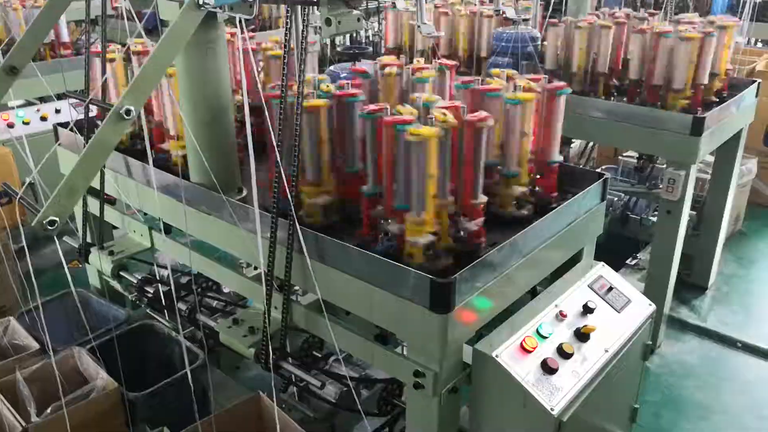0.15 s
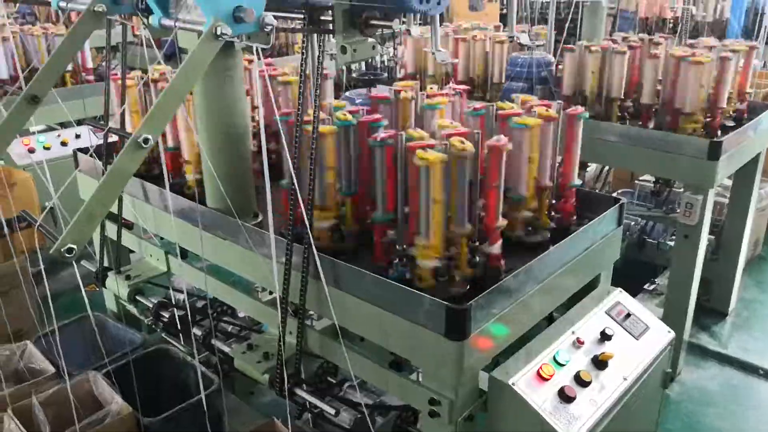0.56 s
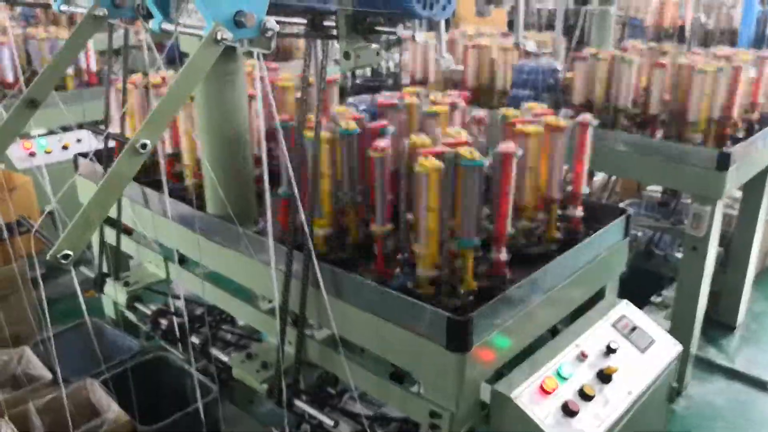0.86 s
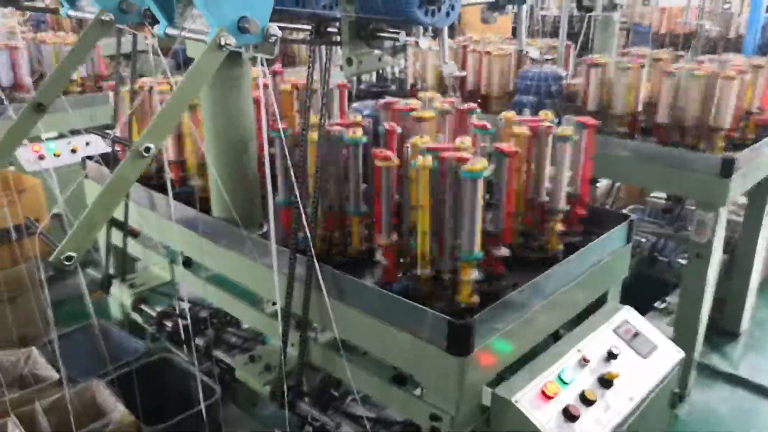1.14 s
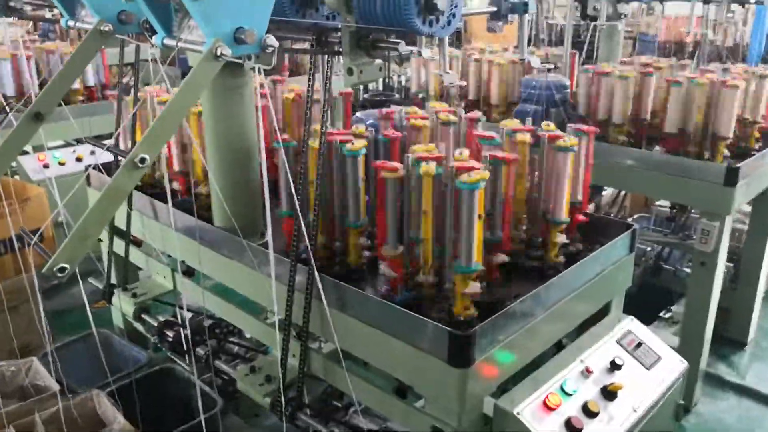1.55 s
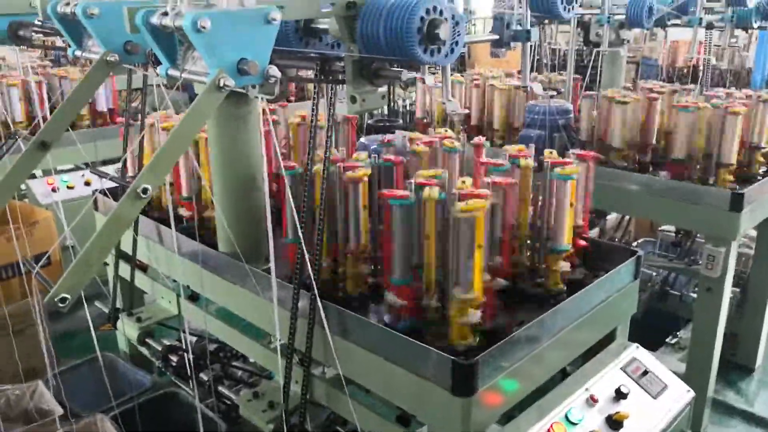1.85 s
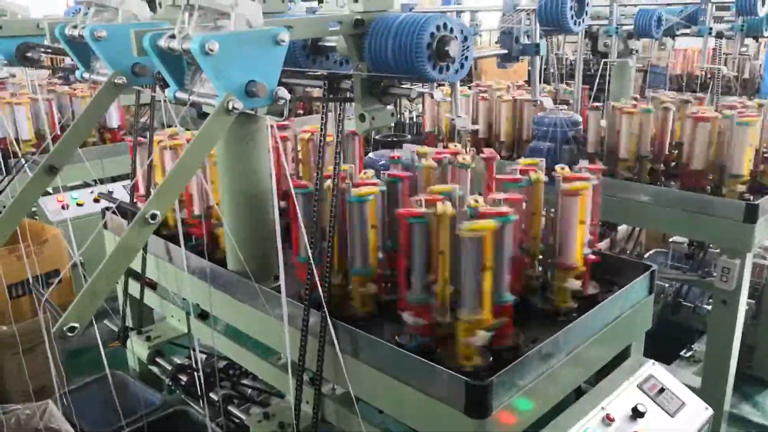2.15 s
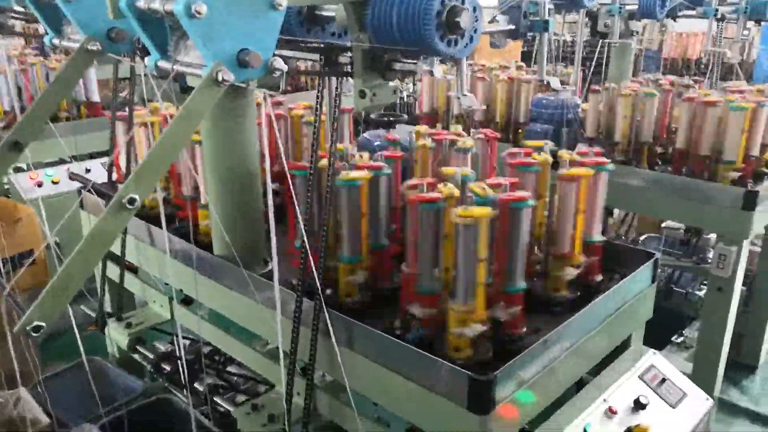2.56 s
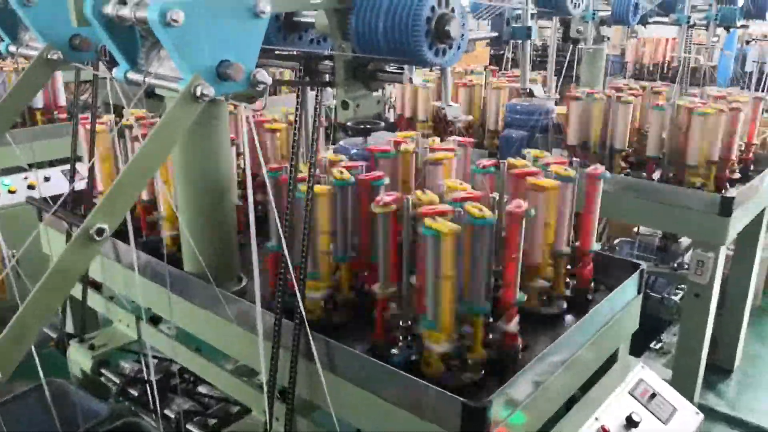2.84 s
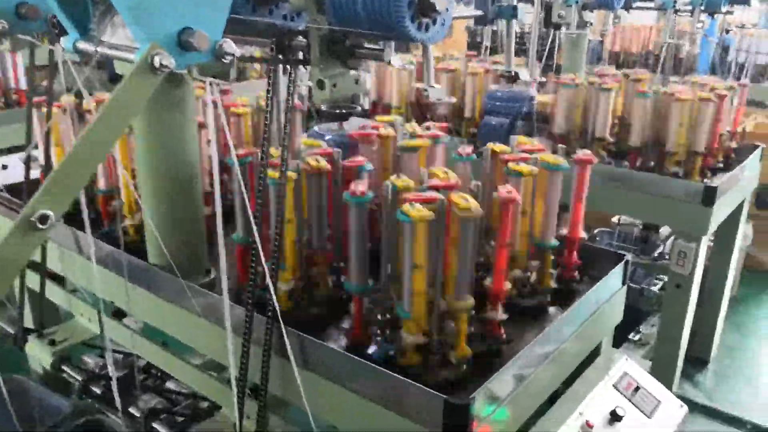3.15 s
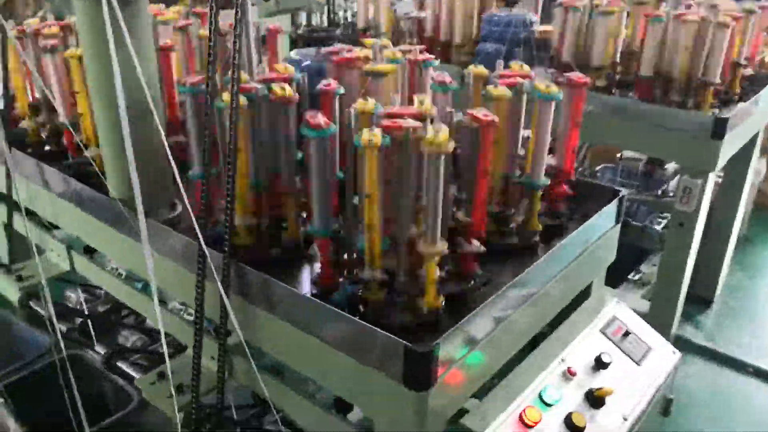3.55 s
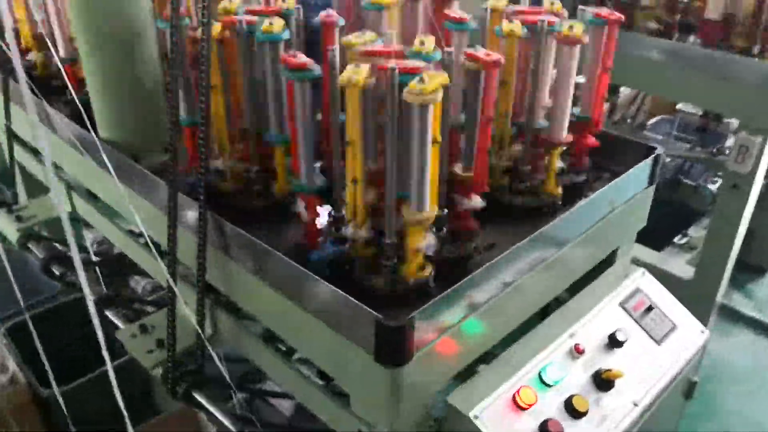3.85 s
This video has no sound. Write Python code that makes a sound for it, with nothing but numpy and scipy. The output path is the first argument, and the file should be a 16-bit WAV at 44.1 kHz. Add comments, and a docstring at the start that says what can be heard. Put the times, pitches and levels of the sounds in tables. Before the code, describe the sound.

Rope braiding machines clatter at full speed in a dense metallic roar inside a hard-walled factory.

```python
"""Rope braiding machines clatter at full speed in a hard-walled factory hall; after a short silence they cut in.
Bobbin carriers clack from one horn gear to the next: random ticks crowd round each handover and ring small
steel parts. A diffuse hall tail and a noise wash of far machines blur them into a roar.
Underneath, filtered noise gives the rumble of the frames, and wavering sines the drive hum and gear whine."""
import sys
import numpy as np
from scipy import signal
from scipy.fft import rfft, irfft
from scipy.io import wavfile
from scipy.ndimage import uniform_filter1d, minimum_filter1d

SR = 44100
rng = np.random.default_rng(int(sys.argv[2]) if len(sys.argv) > 2 else 0)


def to_wav(sig):
    """Store sig (one row per channel, or 1-D mono) as 16-bit WAV at the path in sys.argv[1].

    Samples outside -1..1 are clipped; the rate is SR.
    """
    pcm = np.clip(np.atleast_2d(sig), -1, 1) * 32767
    pcm = np.round(pcm).astype(np.int16)
    wavfile.write(sys.argv[1], SR, pcm.T)  # frames by channels


N = 176400
T = np.arange(N) / SR   # time [s]
BIN_HZ = np.arange(N // 2 + 1) * SR / N

TICKS_PER_S, TICK_SPREAD_DB = 900, 3.0   # per machine
BUNCHING = .55   # how tightly ticks crowd round a handover
RING_T60_S, RING_DB = 0.014, -2.5   # decay of the lowest part; level against the bare ticks
LAG_SPREAD_MS = .08   # the parts of one machine lie in slightly different directions


def carriers(handovers_per_s, handover_s, lag_ms, count=72):
    """Periodically modulated random impacts: each tick excites one steel part, heard from its own direction."""
    crowd = np.exp(BUNCHING * np.cos(2 * np.pi * handovers_per_s * (T - handover_s)))
    at = np.flatnonzero(rng.random(N) < TICKS_PER_S * crowd / crowd.mean() / SR)
    size_db = TICK_SPREAD_DB * np.minimum(rng.exponential(1, at.size), 3.5)
    sizes = from_db(size_db) * rng.choice([-1, 1], at.size)
    part = rng.integers(0, count, at.size)
    grip = rng.uniform(-0.97, 1, at.size)   # how well each contact couples to its part
    # one random pitch in each of equal musical steps from 1200 to 9000 Hz
    pitches = 1200 * 7.5 ** ((np.arange(count) + rng.random(count)) / count)
    lags_ms = lag_ms + LAG_SPREAD_MS * rng.standard_normal(count)
    lags = np.round(lags_ms * SR / 1000).astype(int)   # in samples
    ticks, rings = np.zeros((2, N)), np.zeros((2, N))
    for k in range(count):
        chosen = part == k
        clicks, strikes = np.zeros(N), np.zeros(N)
        clicks[at[chosen]] = sizes[chosen]
        strikes[at[chosen]] = (sizes * grip)[chosen]
        height = pitches[k] / pitches[0]
        rung = height * ring(strikes, pitches[k], RING_T60_S / height)   # higher parts die away sooner
        ticks += [clicks, np.roll(clicks, lags[k])]
        rings += [rung, np.roll(rung, lags[k])]
    return rms_one(ticks) + from_db(RING_DB) * rms_one(rings)


def ring(clicks, hz, t60):
    """Damped resonance: a two-pole filter rings as one struck mode."""
    r, w = from_db(-60 / (t60 * SR)), 2 * np.pi * hz / SR
    poles = [1, -2 * r * np.cos(w), r * r]
    return signal.lfilter([np.sin(w), 0, -np.sin(w)], poles, clicks + 1e-18) / np.sin(w)


# Nearby machines: (handovers [1/s], time of one handover [s], level before colour and swells [dB],
# left-right level difference before colour [dB], mean lag of the right ear [ms])
NEAR_MACHINES = [(19.14, .415, -24.5, 4, -.6), (18.44, .393, -25, 0, -.55), (13.86, .403, -26.5, 1.5, .6)]


def near_machines():
    """Interaural level and time differences place each machine in the stereo field."""
    machines = []
    for handovers_per_s, handover_s, db, pan_db, lag_ms in NEAR_MACHINES:
        ear_db = db + np.array([[pan_db], [-pan_db]]) / 2
        machines.append(from_db(ear_db) * rms_one(carriers(handovers_per_s, handover_s, lag_ms)))
    return machines


# The clatter swells as the carriers circle: (rate [1/s], time of one crest [s], depth before SWELL_DEPTH [dB])
CIRCLING_SWELLS = [(2.66, .45, .36), (.77, 1.2, .3), (4.42, .553, .24), (3.11, .553, .16)]
SWELL_DEPTH = .8   # share of the listed depths


def circling_db():
    """Amplitude modulation: periodic swells add up in dB."""
    swells = [db * np.cos(2 * np.pi * rate * (T - crest_s)) for rate, crest_s, db in CIRCLING_SWELLS]
    return SWELL_DEPTH * sum(swells)


# Relative spectrum of the steel clatter: (frequency [Hz], left density [dB per Hz], right density [dB per Hz])
STEEL_COLOUR = [(60, -43, -49), (250, -21, -21), (436, -5.5, -5), (554, -11.5, -11), (797, -2.5, -2),
                (945, -6, -5.5), (1455, -6, -5), (1606, -2.1, -3), (2200, -2.5, 0.4), (2840, -2.5, -2),
                (3070, -4.5, -4), (3940, -7.5, -6.5), (5030, -8, -5.5), (5270, -5.5, -3.5),
                (5950, -6.5, -4), (6100, -11.5, -6), (6880, -7, -5), (7200, -3, -6), (7900, -9, -9.5),
                (8190, -16.5, -16), (9060, -21.5, -19.5), (10100, -30.5, -25.5), (12500, -40.5, -34),
                (15000, -48, -38.5)]


def steel(both):
    """Spectral shaping: each ear's clatter takes on the colour of the steel."""
    sides_db = np.array([at_hz(STEEL_COLOUR, column=1), at_hz(STEEL_COLOUR, column=2)])
    gains = rms_one(np.sqrt(np.mean(from_db(sides_db) ** 2, axis=1)))   # balance of the ears
    return np.array([gain * x.std() * colour(x, db) for x, db, gain in zip(both, sides_db, gains)])


# Course of the clatter, played about its mean and scaled by CLATTER_FOLLOWS: (time [s], level [dB])
CLATTER_COURSE = [(0.45, -13.5), (0.47, -15), (0.79, -15), (2.2, -14), (2.24, -18), (2.36, -14),
                  (2.5, -15.5), (2.77, -13), (3.27, -14.5), (3.45, -12), (3.6, -15), (3.95, -13.5)]
CLATTER_FOLLOWS = 0.39   # share of the swing that is played
HALL_DB = -3   # tail against the near machines
FAR_DB, FAR_FLUTTER_DB = -13.5, 0.2   # wash before colour and swells; rms flutter


def clatter():
    """Superposition of direct sound, reverberant tail and a distant wash under one envelope and colour."""
    machines = near_machines()
    near = sum(machines)
    tail = from_db(HALL_DB) * near.std() * hall([machine[0] for machine in machines])
    far = from_db(FAR_DB + FAR_FLUTTER_DB * drift(25)) * rng.standard_normal((2, N))
    level_db = circling_db() + CLATTER_FOLLOWS * swing(CLATTER_COURSE)
    return steel((near + tail + far) * from_db(level_db))


HALL_T60_S = 1.2


def hall(sources):
    """Diffuse reverberation: convolution with decaying noise, different for each source and each ear."""
    decay = from_db(-60 * T / HALL_T60_S)
    tails = [rfft(x) * rfft(rng.standard_normal((2, N)) * decay) for x in sources]
    return rms_one(irfft(sum(tails), N))


# Course of the level around 172 Hz, hum and noise together, played about its mean and scaled by HUM_FOLLOWS:
# (time [s], level [dB])
HUM_BAND_COURSE = [(0.37, -25), (0.68, -23.5), (1.12, -37), (1.22, -45), (1.31, -37), (1.75, -22),
                   (2.31, -41), (2.81, -23.5), (3.08, -36), (3.14, -19), (3.29, -36), (3.57, -34),
                   (3.61, -41), (4.0, -30)]
HUM_HZ = 172.1
HUM_DB, HUM_FOLLOWS = -32, 0.91   # mean level; share of the swing that is played


def drive_hum():
    """Amplitude modulation: a sine of nearly steady pitch follows the level around 172 Hz."""
    level_db = HUM_DB + HUM_FOLLOWS * swing(HUM_BAND_COURSE)
    return from_db(level_db) * tone(HUM_HZ, wander_hz=0.36, lag=0.1)


# Motor and gear tones: (frequency [Hz], level [dB], rms pitch wander [Hz], rms level wander [dB],
# phase lag of the right ear [rad])
GEAR_TONES = [(96.8, -48.5, 0.51, 6.5, 0.17), (115.6, -44, 0.63, 1.5, 0), (399, -37.5, 2.54, 4, 0.62),
              (802.2, -33, 0.68, 1.5, 0.084), (824, -40, 0.74, 3, 0.42)]


def gear_whine():
    """Line spectrum: motor and gear tones each waver randomly in pitch and level."""
    return sum(from_db(db + wander_db * drift(12)) * tone(hz, wander_hz, lag)
               for hz, db, wander_hz, wander_db, lag in GEAR_TONES)


def tone(hz, wander_hz, lag):
    """Frequency modulation: a randomly wavering sine of rms 1, with an interaural phase lag in radians."""
    phase = 2 * np.pi * np.cumsum(hz + wander_hz * drift(4.7)) / SR
    return np.sqrt(2) * np.sin([phase, phase - lag])


# Left-right likeness of the rumble: (frequency [Hz], correlation [-1 to 1])
RUMBLE_LIKENESS = [(60, .99), (130, .97), (200, 0.95), (300, 0.93), (450, 0.23), (800, 0.12)]


def correlated_pair():
    """Interaural coherence: a mid and a side noise mix to the wanted correlation at each frequency."""
    alike = np.clip(at_hz(RUMBLE_LIKENESS), 0, .998)
    mid, side = rfft(rng.standard_normal((2, N)))
    return irfft(np.sqrt(1 + alike) * mid + np.sqrt(1 - alike) * side * np.array([[1], [-1]]), N)


# Relative spectrum of the frame rumble: (frequency [Hz], density [dB per Hz])
RUMBLE_COLOUR = [(20, -28), (35, -26), (50, -13.5), (80, -11), (125, -11.5), (160, 2), (210, 0), (300, -1),
                 (430, -6), (560, -27.5), (900, -39)]
# Course of the rumble, played about its mean and scaled by RUMBLE_FOLLOWS: (time [s], level [dB])
RUMBLE_COURSE = [(0.45, -28.5), (0.48, -27), (0.58, -28.5), (1.38, -25.5), (2.05, -29.5), (3.13, -27.5),
                 (3.19, -32.5), (3.35, -23.5), (3.54, -30), (3.59, -21), (3.66, -36), (3.73, -21.5),
                 (3.83, -25), (3.95, -29.5)]
RUMBLE_DB, RUMBLE_FLUTTER_DB = -24.5, 1.5   # overall rms level; rms flutter
RUMBLE_FOLLOWS = 0.74   # share of the swing that is played


def frames():
    """Broadband vibration: the frames rumble as filtered noise, most alike in both ears at low frequencies."""
    level_db = RUMBLE_FOLLOWS * swing(RUMBLE_COURSE) + RUMBLE_FLUTTER_DB * drift(50)
    return from_db(RUMBLE_DB) * colour(correlated_pair() * from_db(level_db), at_hz(RUMBLE_COLOUR))


def from_db(db):
    """Logarithmic level: decibels to amplitude gain."""
    return 10 ** (np.asarray(db) / 20)


def rms_one(x):
    """Normalization to unit rms."""
    return x / np.sqrt(np.mean(x ** 2) + 1e-20)


def at_hz(table, column=1):
    """Interpolation on a logarithmic frequency scale: a table column at every FFT bin."""
    table = np.array(table)
    return np.interp(np.log(BIN_HZ + 1), np.log(table[:, 0]), table[:, column])


def colour(x, db):
    """Minimum-phase filtering: a folded cepstrum gives a causal filter of this dB shape; rms 1."""
    cepstrum = irfft(np.log(from_db(db)), N)
    cepstrum[1:N // 2] *= 2
    cepstrum[N // 2 + 1:] = 0
    return rms_one(irfft(rfft(x) * np.exp(rfft(cepstrum)), N))


def drift(rate):
    """Low-pass random process: zero-mean wander of rms 1, slower than about rate in Hz."""
    spectrum = rfft(rng.standard_normal(N)) * (BIN_HZ > 0)
    return rms_one(irfft(spectrum / (1 + (BIN_HZ / rate) ** 2), N))


def swing(curve):
    """Level envelope: a curve at every sample, in dB about its mean."""
    db = np.interp(T, *np.transpose(curve))
    return db - db.mean()


def scene():
    """Linear superposition of all sources on the factory floor."""
    return clatter() + drive_hum() + gear_whine() + frames()


START_S, LIMIT_TOP, CUTOFF_HZ = .3683, .95, 15080


def record(dry):
    """Peak limiting and band limiting: sound cuts in, the highest peaks are held, the top is cut."""
    room = LIMIT_TOP / np.maximum(np.abs(dry).max(axis=0), LIMIT_TOP)
    gain = uniform_filter1d(minimum_filter1d(room, size=65), size=65)   # about 1.5 ms
    low_pass = signal.ellip(12, .1, 80, CUTOFF_HZ, fs=SR, output="sos")
    return signal.sosfilt(low_pass, dry * gain * (T >= START_S))


dry = scene()
out = record(dry)
to_wav(out)
```